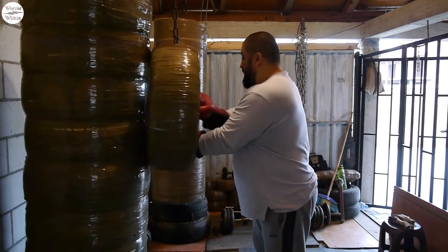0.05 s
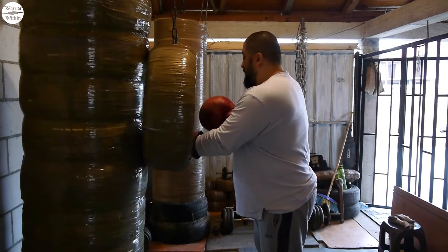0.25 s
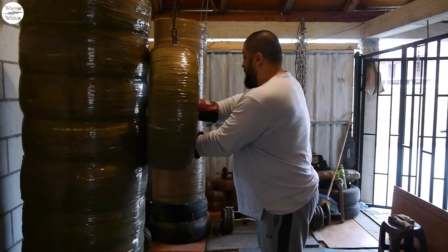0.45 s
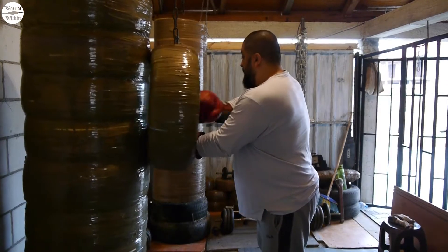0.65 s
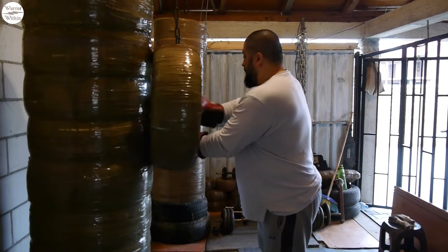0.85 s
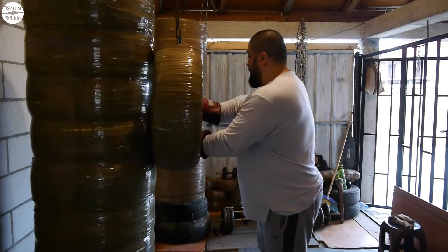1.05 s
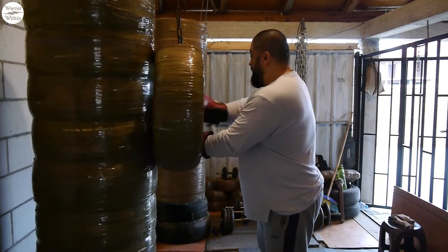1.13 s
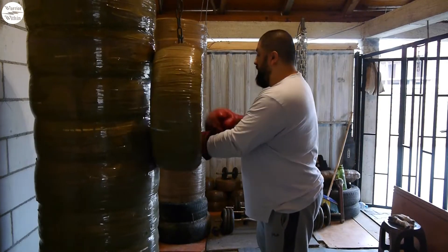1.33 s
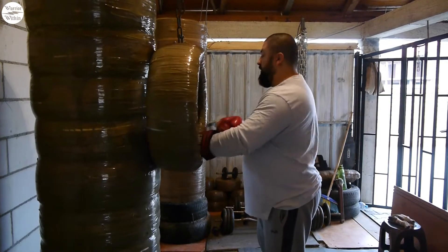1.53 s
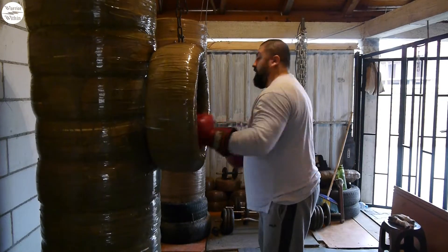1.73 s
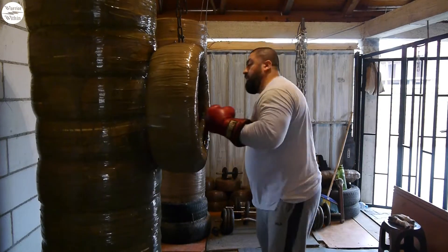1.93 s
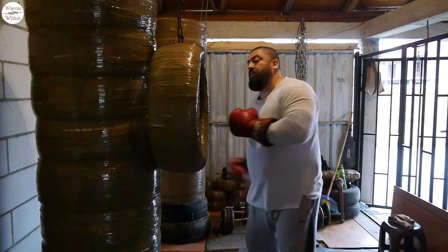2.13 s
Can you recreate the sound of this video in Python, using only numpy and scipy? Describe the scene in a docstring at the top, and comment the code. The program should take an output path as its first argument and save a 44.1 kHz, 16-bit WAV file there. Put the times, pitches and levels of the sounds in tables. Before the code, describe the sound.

Three gloved punches thud into a plastic-wrapped hanging tyre, its chain clanking after each.

```python
"""Punches on a tyre bag

Three gloved punches land on a hanging tyre bag wrapped in plastic film, in a hard-walled garage.
Each blow thuds, crushes the film and a moment later snaps the chain taut, which clanks and rings.
Between blows the film crinkles as the bag sways and the gloves brush it, and shoes scuff the floor."""
import sys
import numpy as np
from scipy import signal
from scipy.fft import rfft, irfft
from scipy.io import wavfile

SR = 44100
rng = np.random.default_rng(int(sys.argv[2]) if len(sys.argv) > 2 else 0)


def digitize_waveform(pressure):
    """Quantize a signal to 16-bit integers and store it at the path in sys.argv[1].

    Rows of a 2-D input are taken as channels; values are limited to [-1, 1].
    """
    field = np.atleast_2d(pressure).T
    bounded = np.clip(field, -1, 1)
    quanta = np.round(bounded * 32767).astype(np.int16)
    wavfile.write(sys.argv[1], SR, quanta)


N = 97020
T = np.arange(N) / SR
HZ = np.fft.rfftfreq(N, 1 / SR)

# Spectra of the noise sources. Each row: frequency in Hz, relative level in dB.
AIR_SPECTRUM = [(25, 6), (60, -8), (120, -11), (200, -3.5), (450, 2.5), (800, 2.5), (1500, 4.5),
                (2200, -10.5), (4700, 1), (9500, -11.5), (12500, -39), (15500, -35)]
RUSTLE_SPECTRUM = [(60, -11), (170, -18.5), (450, 0), (1500, 4), (3000, 1), (6000, -12), (11000, -8),
                   (16000, -18.5)]
CRINKLE_SPECTRUM = [(60, -62), (300, -14.5), (900, -4.5), (3000, -7.5), (7000, -5.5), (11500, -7),
                    (14000, -13), (16000, -24)]
CRUSH_SPECTRUM = [(60, -32), (250, -1.5), (700, 4), (2000, 4.5), (5000, 1.5), (10000, 1), (13000, -4.5),
                  (16000, -11)]
SKID_SPECTRUM = [(100, -50), (5000, -15), (6800, -12), (8700, -4), (10000, -10), (12000, -20), (16000, -30)]
SLAP_SPECTRUM = [(40, -30), (100, -23), (200, -1), (450, 0), (1100, 8), (2000, -4.5), (5000, -14.5),
                 (16000, -25)]
SHUDDER_SPECTRUM = [(40, -11), (90, -14), (150, 3.5), (280, 0), (460, 2), (700, -14), (2000, -35),
                    (16000, -70)]
CLANK_SPECTRUM = [(60, -42), (250, -8.5), (600, -3), (1100, -2.5), (2300, 0.5), (4000, -2.5), (7500, -7),
                  (10000, -19.5), (12800, -17), (13300, -5), (14700, -6), (15600, -26)]
SCUFF_SPECTRUM = [(60, -25), (300, -31), (750, 5), (1600, 5), (2800, 2), (6000, -6.5), (16000, -22)]
# Rustle of the swaying bag. Each row: time in seconds, level in dB.
RUSTLE_LEVEL = [(0, -33), (.11, -34), (.28, -35.5), (.38, -36), (1.2, -40.5), (1.45, -43), (1.7, -41),
                (1.98, -46.5), (2.2, -42)]
# Light touches on the film. Each row: start in seconds, level in dB, rise and hold in seconds,
# tilt in dB per octave.
CRINKLES = [(0.0, -32.5, 0.0015, 0.021, 0), (0.133, -38.5, 0.0023, .005, 9),
            (0.172, -24.5, 0.0029, 0.0094, -3), (0.223, -32, 0.0024, 0.0099, 14),
            (0.27, -32.5, 0.0062, 0.0063, -6.5), (0.308, -46, .003, 0.0057, -9.5),
            (0.7, -30.5, .022, 0.022, 0.5), (1.357, -28, 0.0048, 0.016, 1.5),
            (1.476, -37.5, 0.0024, 0.0078, 0.5), (1.545, -40, 0.00298, 0.018, -2),
            (1.608, -30.5, 0.0046, 0.02, 2), (1.747, -36.5, .005, 0.018, 1), (1.836, -34, 0.015, 0.039, 1),
            (1.985, -43.5, 0.0033, .008, 8)]
# Blows on the bag. Each row: start in seconds, boom level in dB and frequency in Hz,
# pop level in dB and frequency in Hz, slap level in dB, film level in dB.
PUNCHES = [(0.3972, -28.5, 270, -6, 566, -11, -18.5), (0.7303, -11.5, 286, -25, 640, -14.5, -19),
           (0.987, -13, 261, -15, 685, -15.5, -19)]
# A glove skidding on the film. One row: start in seconds, level in dB, hold in seconds.
SKID = (0.461, -17, 0.0063)
# Snaps of the chain. Each row: start in seconds, level in dB, hold in seconds, tilt in dB per octave,
# gain of the ring from 0 to 1.
CLANKS = [(0.474, -15, 0.019, 0.5, 0.8), (0.759, -19.5, 0.0068, -2, 0), (0.81, -14, 0.014, 1, 0.65),
          (1.0634, -15, 0.013, 0.5, 0.2)]
# Modes of the chain and hook. Each row: frequency in Hz, level in dB, time to fall 60 dB in seconds.
STEEL_MODES = [(646, -3, .7), (1007, -1, .7), (1126, -4, .7), (1560, -3, .7), (1613, -2, .8),
               (1753, -3, .8), (2242, -1, .6), (2320, -3, .5), (2800, -1, .6), (3213, -5, .6),
               (3444, 3, .85), (3466, 1, .8), (4010, -3, .6), (5268, 0, .45), (5391, 5, .65),
               (5490, -2, .45), (6070, -4, .4), (6278, -1, .5), (7420, -7, .4), (8560, -8, .4),
               (13310, -2, .6), (13400, -6, .45), (14550, -6, .3)]
# Shoe scuffs. Each row: start in seconds, level in dB, hold in seconds, tilt in dB per octave.
SCUFFS = [(1.763, -37, 0.083, 0.5), (1.862, -36.5, 0.077, -6), (2.009, -41, 0.049, 2.5),
          (2.137, -37.5, 0.053, -1.5)]
# Reflections from nearby surfaces. Each row: delay in seconds, relative gain.
ECHOES = [(.0028, 0.082), (.0066, 0.019), (.0088, 0.03), (0.032, .06)]
# Reverberation of the garage. Each row: frequency in Hz, time to fall 60 dB in seconds.
ROOM_T60 = [(100, .6), (300, 1), (700, 0.87), (1800, 0.77), (4600, 0.62), (12000, 0.38), (16000, 0.25)]
# Bands the garage favours or weakens. Each row: frequency in Hz, gain in dB.
GARAGE_COLOUR = [(120, -0.5), (350, -1), (460, 2), (570, 1), (850, 0), (1010, -1), (1290, -1.5), (1500, 0),
                 (1750, -0.5), (2700, -0.5), (12000, 0.5)]
# Stereo width. Each row: frequency in Hz, level of side relative to mid in dB.
WIDTH = [(40, -39), (110, -18), (220, -23.5), (450, -20.5), (750, -14.5), (1400, -9.5), (2600, -1.5),
         (6000, -5.5), (15000, 0)]


def amp(db):
    """Amplitude grows tenfold for every 20 dB."""
    return 10 ** (db / 20)


def read(table, hz):
    """Interpolation along a logarithmic frequency axis."""
    freqs, values = np.transpose(table)
    return np.interp(np.log(hz + 1), np.log(freqs), values)


def delay(x, seconds):
    """A pure delay shifts a sound later in time."""
    silence = np.zeros(x.shape[:-1] + (round(seconds * SR),))
    return np.concatenate([silence, x], -1)[..., :N]


def stereo(pair, db=0):
    """Mid-side mixing colours two independent noises into unit-rms stereo: bass centred, treble wide."""
    mid, side = rfft(pair)
    width = amp(read(WIDTH, HZ))
    channels = np.array([mid + 1j * width * side, mid - 1j * width * side])
    x = irfft(channels * amp(db) / np.hypot(1, width), N)
    return x / np.sqrt(np.mean(x ** 2) + 1e-20)


def tilted(spectrum, tilt):
    """A spectral slope, in dB per octave and flattening in the bass, sets brightness."""
    return read(spectrum, HZ) + tilt * np.log2((HZ + 300) / 3000)


def hiss(spectrum, tilt=0):
    """Filtered Gaussian noise gives a smooth hiss."""
    return stereo(rng.standard_normal((2, N)), tilted(spectrum, tilt))


def crackle(spectrum, tilt=0, snaps_per_s=5000, spread_db=3):
    """Shot noise: tiny snaps of uneven size arrive at random."""
    sizes = amp(spread_db * np.minimum(rng.exponential(1, N), 3))
    occurs = rng.random(N) < snaps_per_s / SR
    signs = np.sign(rng.standard_normal((2, N)))
    return stereo(sizes * occurs * signs, tilted(spectrum, tilt))


def envelope(start, rise, hold, fall):
    """A linear rise and an exponential decay that begins hold seconds after the start."""
    return np.clip((T - start) / rise, 0, 1) * np.exp(-np.clip((T - start - hold) / fall, 0, 20))


def echoes(x):
    """Each nearby surface reflects a delayed, weaker copy."""
    return sum(gain * delay(x, lag) for lag, gain in ECHOES)


def garage(x, wet_db):
    """Reverberation: early echoes and a diffuse tail, whose treble dies first, join the direct sound."""
    noise = stereo(rng.standard_normal((2, N)))[:, :SR]
    hz, t, bands = signal.stft(noise, SR, nperseg=256)
    decay = amp(-60 * t / read(ROOM_T60, hz)[:, None])
    tail = signal.istft(bands * decay, SR, nperseg=256)[1]
    tail *= np.minimum(T[:tail.shape[1]] / 0.0083, 1)  # reflections build up
    tail /= np.sqrt(np.sum(tail ** 2) / 2)
    diffuse = signal.fftconvolve(x, tail, axes=1)[:, :N]
    return x + 0.8 * echoes(x) + amp(wet_db) * diffuse


def air():
    """The air of the garage is heard as stationary noise."""
    return amp(-42.5) * hiss(AIR_SPECTRUM)


def rustle():
    """As the bag sways, snaps too dense to hear singly merge into a rustle."""
    level = amp(np.interp(T, *np.transpose(RUSTLE_LEVEL)))
    return level * crackle(RUSTLE_SPECTRUM, snaps_per_s=13000, spread_db=5.5)


def film():
    """Plastic film buckles in tiny snaps under blows and touches; a skidding glove's friction zips."""
    out = np.zeros((2, N))
    for start, *_, db in PUNCHES:
        sag_db = 91 * (T - start)
        crush = envelope(start, rise=0.0068, hold=0.044, fall=0.06)
        out += amp(db - sag_db) * crush * crackle(CRUSH_SPECTRUM)
    for start, db, rise, hold, tilt in CRINKLES:
        out += amp(db) * envelope(start, rise, hold, fall=0.01) * crackle(CRINKLE_SPECTRUM, tilt)
    start, db, hold = SKID
    out += amp(db) * envelope(start, rise=0.002, hold=hold, fall=0.01) * hiss(SKID_SPECTRUM)
    return garage(out, wet_db=-1)


def knock(hz, peak_s):
    """A heavily damped skin radiates pressure as the rate of change of its motion."""
    age = np.minimum(T / peak_s, 20)
    motion = age * np.exp(1 - age) * np.sin(2 * np.pi * hz * T)
    return np.gradient(motion) * SR / (2 * np.pi * hz)


def thuds():
    """Impact excites the hollow bag: it booms and shudders, trapped air pops and the leather slaps."""
    cavity_hz, cavity_t60 = 284, 0.39  # the air inside the tyre rings on after the boom
    cavity = amp(-20 - 60 * T / cavity_t60) * np.sin(2 * np.pi * cavity_hz * T)
    knocks, noise = np.zeros((2, 2, N))
    for start, boom_db, boom_hz, pop_db, pop_hz, slap_db, _ in PUNCHES:
        boom = amp(boom_db) * knock(boom_hz, peak_s=0.0023)
        pop = amp(pop_db) * knock(pop_hz, peak_s=0.0012)
        blow = delay(boom - pop, start)
        knocks += blow + echoes(blow) + amp(boom_db) * delay(cavity, start)
        slap = hiss(SLAP_SPECTRUM) * envelope(start, rise=0.00033, hold=0.00033, fall=0.012)
        shudder = hiss(SHUDDER_SPECTRUM) * envelope(start, rise=0.0083, hold=0.0083, fall=0.025)
        noise += amp(slap_db) * slap + amp(boom_db - 17.5) * shudder
    return knocks + garage(noise, wet_db=-8)


def steel_ring():
    """Struck steel vibrates freely as a sum of exponentially decaying modes."""
    t = T[:SR]
    tones = np.zeros((2, N))
    for hz, db, t60 in STEEL_MODES:
        phase = 2 * np.pi * rng.random()
        stereo_phase = np.array([[1], [-1]]) * np.arctan(amp(read(WIDTH, hz))) * rng.choice([-1, 1])
        tones[:, :SR] += amp(db - 60 * t / t60) * np.sin(2 * np.pi * hz * t + phase + stereo_phase)
    return tones / np.sqrt(len(STEEL_MODES) / 2)


def chain():
    """Links collide as the chain goes taut, exciting the resonances of the steel."""
    clack, clash, ring = np.zeros((3, 2, N))
    for start, db, hold, tilt, ring_gain in CLANKS:
        links = amp(db) * crackle(CLANK_SPECTRUM, tilt, snaps_per_s=7000, spread_db=2.5)
        clack += links * envelope(start, rise=0.002, hold=hold, fall=0.0093)  # first strike, heard dry
        clash += links * envelope(start, rise=0.002, hold=hold, fall=0.016)
        swell = np.minimum(T / hold, 1)
        ring += ring_gain * delay(steel_ring() * swell, start)
    half_width_hz, boost = 15.8, 1.4
    resonances = sum(amp(db) / (1 + 1j * (HZ - hz) / half_width_hz) for hz, db, _ in STEEL_MODES)
    response = (1 + boost * resonances) / np.hypot(1, boost / 2)
    jangle = irfft(rfft(clash) * response, N)
    return amp(-11) * clack + garage(jangle, wet_db=-0.5) + amp(-23.5) * ring


def shoes():
    """Sliding friction between soles and concrete makes short bursts of noise."""
    out = np.zeros((2, N))
    for start, db, hold, tilt in SCUFFS:
        out += amp(db) * envelope(start, rise=0.0079, hold=hold, fall=0.016) * hiss(SCUFF_SPECTRUM, tilt)
    return garage(out, wet_db=-9)


def scene():
    """The sources add by superposition, and the garage's frequency response colours the sum."""
    mix = thuds() + film() + chain() + shoes() + rustle() + air()
    colour = amp(read(GARAGE_COLOUR, np.fft.rfftfreq(2 * N, 1 / SR)))
    return irfft(rfft(mix, 2 * N) * colour)[:, :N]


def record(dry):
    """A microphone's range is finite: bass rolls off, peaks clip at full scale and top treble is cut."""
    low_cut_hz, high_cut_hz = 115, 15750
    highpass = signal.butter(3, low_cut_hz, "high", fs=SR, output="sos")
    lowpass = signal.firwin(511, high_cut_hz, window=("kaiser", 9), fs=SR)
    clipped = np.clip(signal.sosfilt(highpass, dry), -1, 1)
    return signal.oaconvolve(clipped, lowpass[None], "same")


dry = scene()
out = record(dry)
digitize_waveform(out)
```